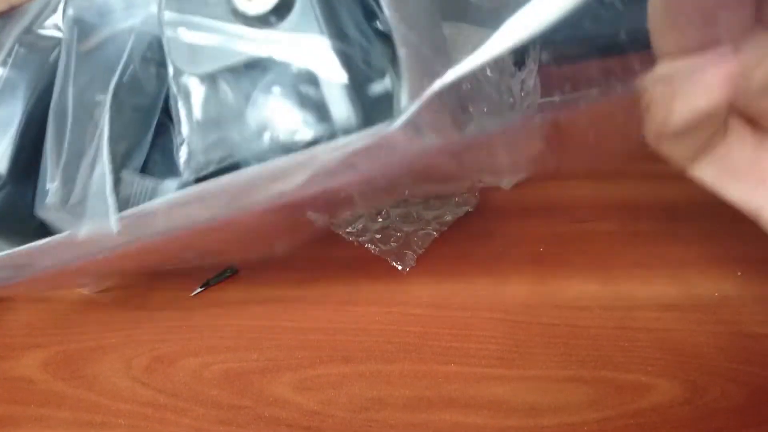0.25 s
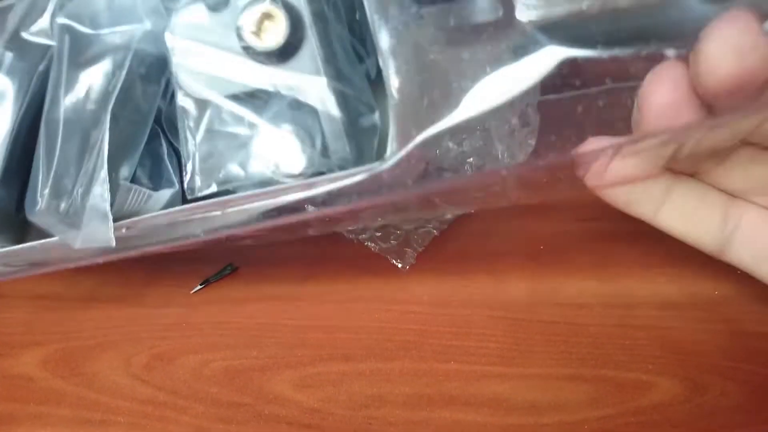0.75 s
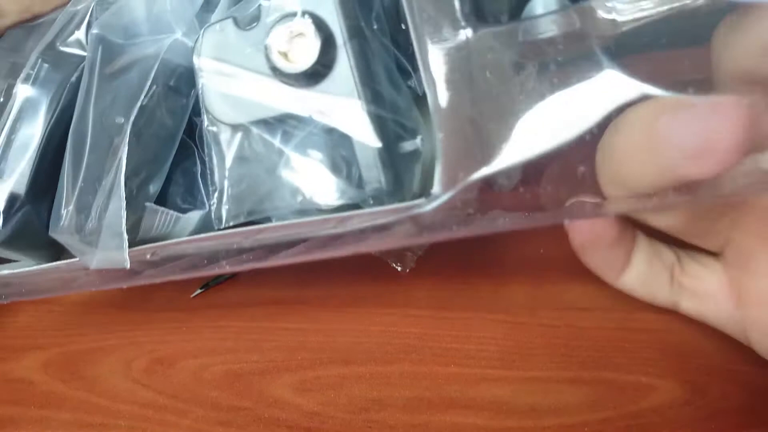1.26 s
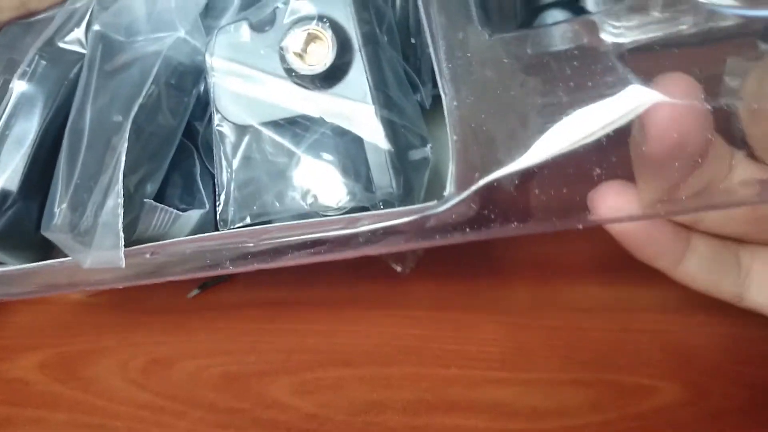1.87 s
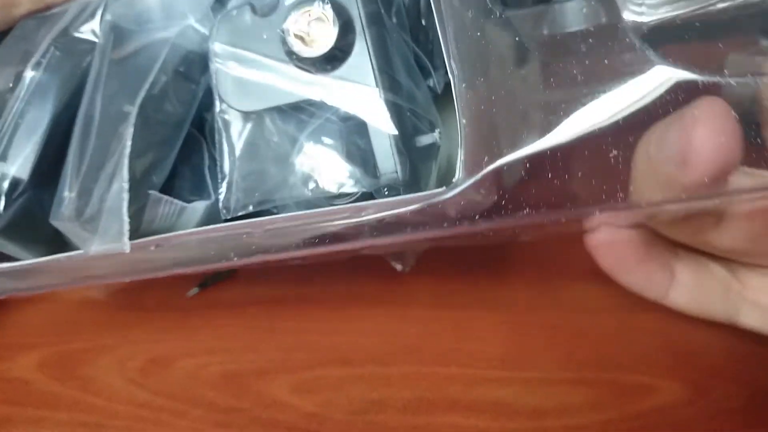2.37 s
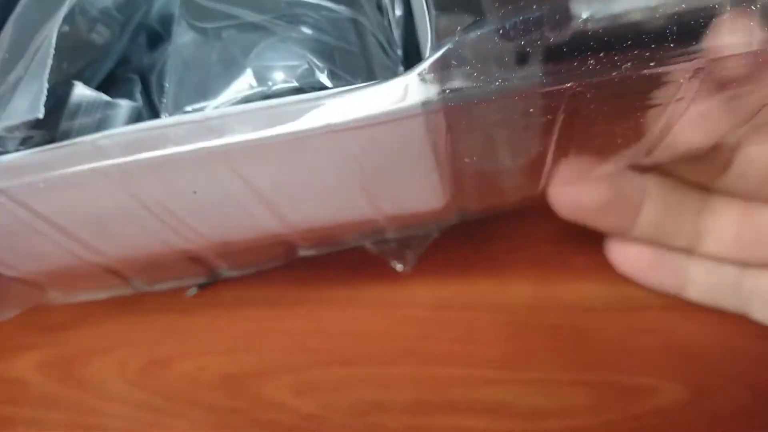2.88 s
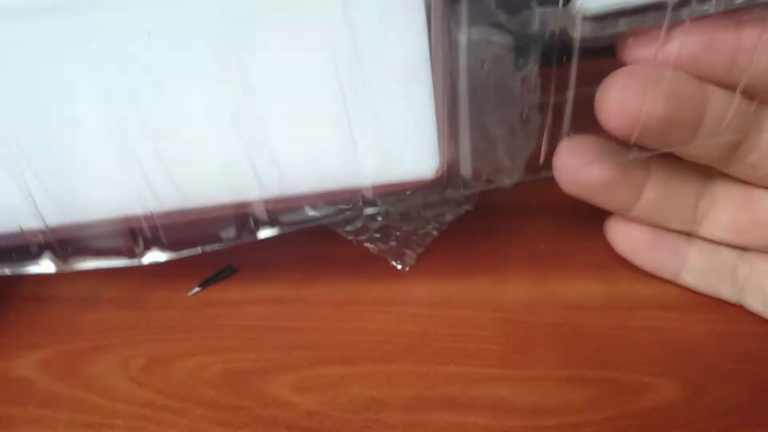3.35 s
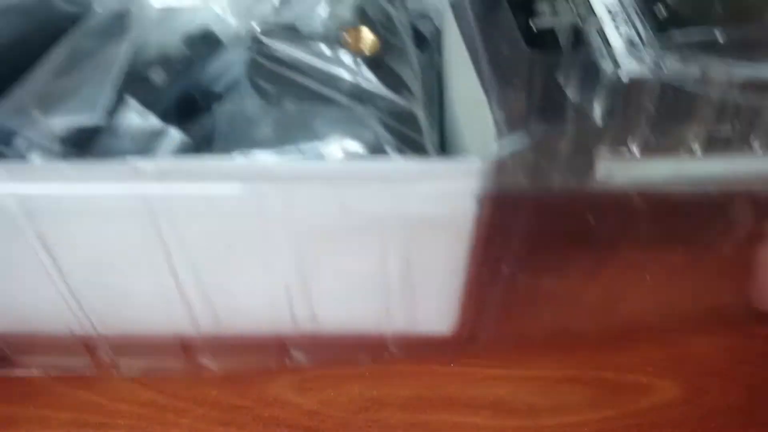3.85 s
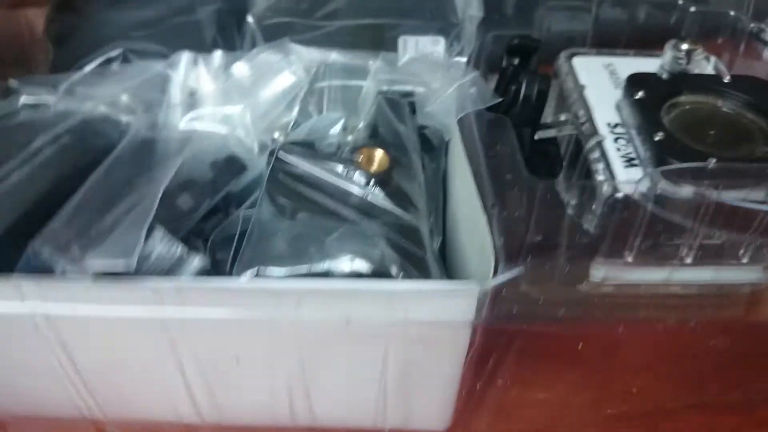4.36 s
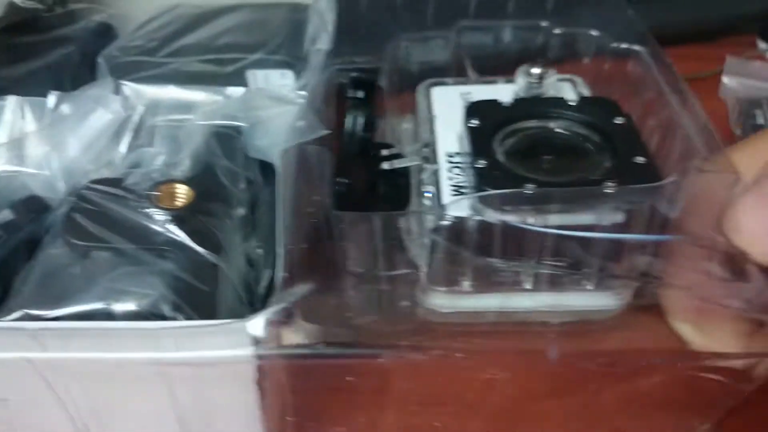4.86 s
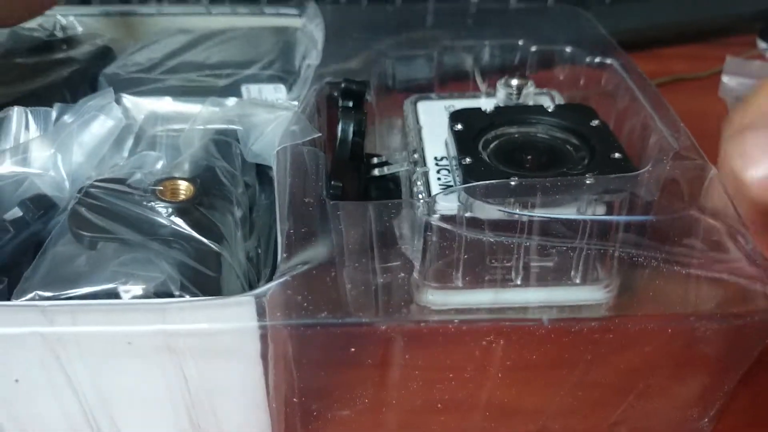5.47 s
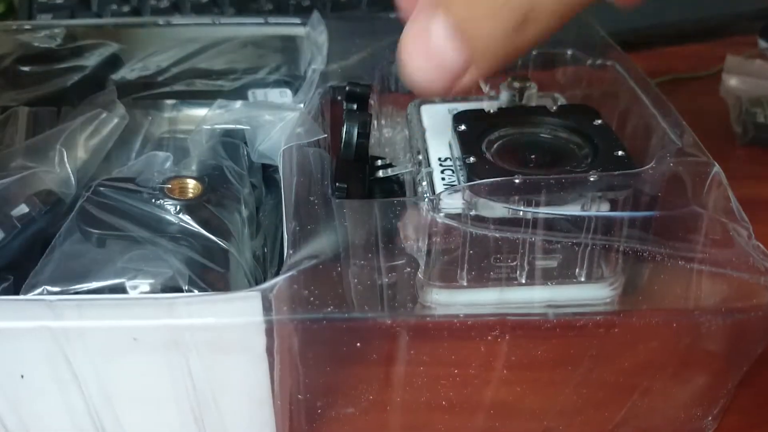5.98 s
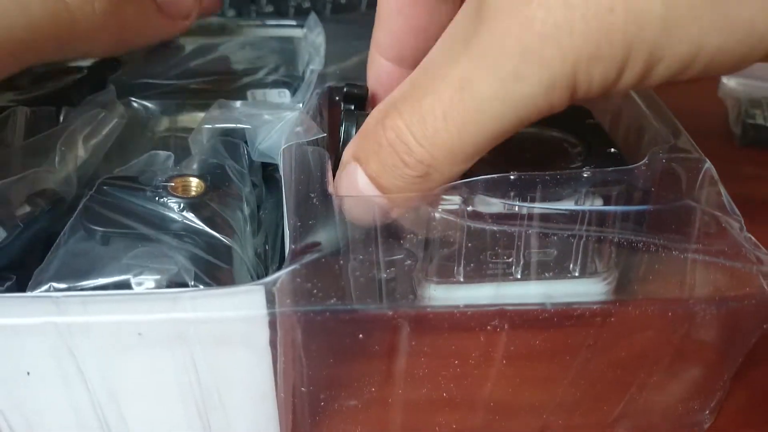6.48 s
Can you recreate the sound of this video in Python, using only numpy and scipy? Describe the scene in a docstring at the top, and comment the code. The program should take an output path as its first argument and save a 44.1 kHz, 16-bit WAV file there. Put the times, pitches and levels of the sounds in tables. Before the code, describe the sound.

Close stereo sound of hands flexing a stiff, thin plastic tray over a wooden desk in a small room. From 0 to 0.8 s, soft crinkles and filmy rustle surround a sharp bright snap at 0.2, with smaller ticks after. At 1.14 a loud, hollow, quickly damped pop lands, trailing rustle until 1.3. Sparse faint clicks follow, with light crackling around 2.2 and 2.6 to 3.0, then a near lull to 3.85. From 3.9 to 4.15 the shell buckles in a dense burst, with strong pops at 4.02 and 4.14 and a bright film scrape. Busy uneven rustling and snaps run from 4.45 to 5.3, another crackle comes at 5.6, then quiet. At 6.17 a small snap precedes a tiny dry finger squeak around 6.25; crackles and pops close at 6.5 to 6.65. Faint hiss, hum and low rumble persist.

```python
"""Hands turn a stiff clear plastic tray over a wooden desk, close to a two-port microphone.
Dents snap through in short ragged slips that ring the shell, and wide panels pop with a damped swing.
Hands and film rub in swells of tiny slips and grains, and a small part squeaks under a finger.
A small room answers with fading noise; behind it lie desk rumble, a faint noise floor and mains hum."""
import sys
import numpy as np
from scipy import signal
from scipy.fft import rfft, irfft, next_fast_len
from scipy.io import wavfile
from scipy.ndimage import uniform_filter1d

SR = 44100
rng = np.random.default_rng(int(sys.argv[2]) if len(sys.argv) > 2 else 0)


def transcribe(u):
    """Save the signal u as a 16-bit wav file named by the first command-line argument.

    u: samples, shape (n,) or (channels, n), limited to [-1, 1]; the rate is SR.
    q: integer samples, one column per channel.
    """
    v = np.clip(np.atleast_2d(u).T, -1, 1)
    q = np.round(v * 32767).astype(np.int16)
    wavfile.write(sys.argv[1], SR, q)


N = 296793  # length in samples

# Dents snapping. Each row: start in seconds, base level in dB, brightness in dB per octave,
# bend of that slope in dB per octave squared, pitch of the dent in Hz, base slip length in ms,
# left minus right in dB.
DENT_SNAPS = [(0.017, -44.5, -6.5, 1.93, 620, 1.1, 5.5), (0.065, -42.5, 4.5, -1.5, 764, 1.7, 1),
              (0.089, -50, -3.5, 1.3, 1160, 2.2, 9), (0.206, -42.5, 2.5, -1.8, 1290, 2.5, 2),
              (0.212, -18.5, 4, -0.69, 1378, 0.98, -2), (0.275, -35, -5, -1, 830, 1.2, 0.5),
              (0.322, -42, 6.5, -2.05, 1480, 2.6, 3), (0.332, -46.5, 0, -2.4, 1490, 2.3, -1),
              (0.343, -49.5, 1.5, 0.53, 407, 3.7, 3.5), (0.428, -51, 0, -2, 900, 2, 6),
              (0.436, -49.5, 8.5, -2.5, 500, 13, 3.5), (0.482, -52, 13.5, -5, 920, 6.4, -2),
              (0.554, -55, 16, -5.5, 513, 5.1, 1), (0.65, -43.5, 5, -5, 800, 2.1, 1),
              (0.737, -58.5, 11.5, -3.5, 680, 1.9, 6), (0.751, -50, 1, -4, 1340, 2.1, -2),
              (0.832, -45.5, -2.5, 0.05, 863, 4.7, 2.5), (0.939, -52.5, -6, 1.98, 1210, 2.7, 3),
              (1.016, -66, -0.5, 0.5, 900, 1.5, 4), (1.064, -53, -7.5, 1.84, 1110, 6, 5.5),
              (1.141, -20.5, -3, -1.4, 770, 4.6, -3), (1.150, -24.5, -2, 0, 1400, 1.6, 2),
              (1.185, -34, 1, -0.32, 760, 2.4, 2.5), (1.281, -39.5, 1.3, -0.42, 1310, 2.6, -0.5),
              (1.306, -56.5, 2.5, -0.6, 904, 2, 0), (1.34, -49.5, -4.5, 0.5, 730, 3.5, 3),
              (1.416, -68.5, 4, -0.5, 900, 1.7, 5), (1.437, -81, 6.5, 0.7, 559, 2.6, -4.5),
              (1.512, -71, 3.5, 0, 900, 1.5, 3), (1.52, -57.5, 2, -1.06, 1400, 4.2, 2.5),
              (1.559, -57, -7, 1.5, 418, 2.1, 4), (1.619, -72, 2.5, 0, 904, 1.6, 5),
              (1.658, -52, -3, -0.2, 696, 1, 5.5), (1.811, -75, 6.5, -0.2, 1400, 0.92, 0),
              (1.826, -57, 7, 0.26, 1410, 1.3, 0.5), (1.943, -58.0, -1, -0.3, 818, 2.7, 1.5),
              (2.11, -43, -0.5, 0.1, 860, 3.5, 2.5), (2.175, -44, -6, -1, 823, 2.5, 2.5),
              (2.209, -40, 2.5, -0.73, 832, 2.5, 3), (2.239, -46, -1, -0.28, 842, 7.1, 4.5),
              (2.557, -54, -2.5, 0.56, 547, 3.6, 2), (2.595, -51.5, -3.5, -0.5, 684, 6, 2),
              (2.607, -51, 1.5, -1.8, 900, 4, 2), (2.723, -43, 3, -0.4, 560, 2.1, 6),
              (2.733, -47, 5.5, 0.08, 579, 1.3, 3.5), (2.749, -49, 1.5, 0.54, 990, 2.3, -1),
              (2.775, -51.0, 1, -1, 1167, 1.6, 0), (2.856, -72.5, -2.5, 1.4, 900, 1.6, 4.5),
              (2.864, -74, -2, 0, 900, 1.5, -2), (2.935, -58.5, 10, -2.5, 880, 1.3, 7.0),
              (2.992, -52.5, 8, -1.62, 980, 1.05, 6), (3.01, -49, -3.8, 1, 1410, 1.5, 1),
              (3.037, -40.5, 1.5, 0.37, 510, 1.66, 3), (3.048, -57.5, 10.5, -2.3, 916, 2.1, 0),
              (3.266, -63.5, 3.4, -1.95, 758, 2.5, 6), (3.378, -58, -0.9, -0.05, 1264, 2.3, 3),
              (3.427, -75.5, 3.5, -0.05, 898, 1.1, 2), (3.493, -64.5, -1.5, -1, 1000, 2.7, 2),
              (3.600, -63, 0.5, -1, 1300, 4, 1.5), (3.613, -68, 4.5, -1, 1304, 2, 2),
              (3.650, -67.5, 6, -1.02, 1404, 1.2, 2.5), (3.659, -58.5, 0, -1, 1100, 2.6, 1.0),
              (3.867, -46.5, 0.5, -3, 620, 1.7, 1), (3.885, -37.5, -1.3, 1, 564, 4.3, 0),
              (3.915, -49, 2.5, 0.08, 794, 1.9, 4), (3.934, -43, 4.5, -1.27, 760, 5.2, 1),
              (3.963, -32, -3, 2.02, 810, 9.3, -4), (3.973, -26.5, 2.5, 0.3, 1250, 5, -2),
              (4.015, -31.5, -1.5, 1.5, 890, 14.4, -9.5), (4.02, -22.5, -1.5, 1.74, 866, 0.93, -0.5),
              (4.136, -25.5, -2.5, 1.01, 810, 1.35, 0.5), (4.222, -50.5, 6.5, -3, 900, 3.7, 6.5),
              (4.264, -66, 0.5, 1.4, 900, 2.2, 2), (4.318, -66.5, 10, -1.35, 820, 2.5, 6),
              (4.327, -62.5, 6.5, -0.1, 825, 2, 13), (4.44, -58.5, 3.5, -1.5, 900, 1.4, 11),
              (4.466, -48, 1, -0.4, 634, 4.4, 2.5), (4.491, -38.5, -0.9, 0.74, 660, 5.3, 4.5),
              (4.5, -41, 2.5, -0.35, 1280, 3.3, -2), (4.511, -42.5, 7, -1.47, 1150, 3.5, 2.5),
              (4.572, -49, 7, -3.5, 684, 2.3, 8), (4.723, -44, -2.5, 1, 1070, 10.7, 3),
              (4.826, -52.5, 0.5, -0.5, 1080, 2.5, 5), (4.865, -42.5, 1.5, 0.35, 1240, 2.4, 6),
              (4.916, -44.5, 1.5, -4.5, 1370, 1.8, 7.5), (4.982, -51.5, 1.25, 0.51, 503, 8.1, 7.5),
              (4.999, -46, 1.5, -0.3, 1170, 1.9, 1), (5.029, -45.5, -3.2, -0.4, 656, 11, 0.5),
              (5.07, -52.5, -0.7, 0.83, 890, 3.2, 0), (5.085, -34.5, -3, 0.85, 604, 2.1, 0),
              (5.114, -48, 5.5, -3, 990, 2.5, 0), (5.153, -52.5, 3.1, -0.2, 1190, 2.2, 0),
              (5.164, -53, 0.5, 0.5, 580, 2.5, 6), (5.186, -51.5, 1.8, 0.5, 1100, 2.9, 0),
              (5.264, -49, -5, 1.66, 473, 2.3, 4), (5.286, -38.5, -4, 0.56, 1210, 5.5, 2),
              (5.294, -39.5, -3, 0.5, 644, 1, 2), (5.308, -52, -1.5, 1.34, 649, 2.8, 6),
              (5.441, -60, -1, 1.07, 880, 1.5, 0.5), (5.474, -61, 0.5, 0.3, 900, 1.4, 1),
              (5.508, -56, -2.5, 1.62, 1150, 1.4, 6), (5.542, -47.5, -6, 1.75, 720, 1.8, -1),
              (5.577, -41, -1, -1.3, 580, 6.3, 1), (5.588, -32, -3.5, 0.38, 1002, 6.8, 1.5),
              (5.605, -39.5, -5.5, 2.06, 685, 7.5, 2.5), (5.932, -71.5, 2, -0.5, 900, 1.5, 1),
              (6.16, -51, 0, -3, 1130, 2.3, 3), (6.167, -37.5, 0.1, -0.18, 873, 2.4, 0.5),
              (6.23, -55, -4, -5, 880, 2.5, 1.5), (6.398, -51.5, 4, -1, 1090, 2.2, 3),
              (6.467, -71, 5, -0.5, 894, 1.5, 1), (6.504, -52, -1.5, 0.5, 1070, 7.5, 4),
              (6.511, -40, -2, -1.7, 1083, 1.9, 2), (6.55, -43.5, 0.5, -1.4, 676, 2.8, 1.5),
              (6.579, -41, -6.5, 0.3, 1110, 5.8, 0), (6.586, -33.5, 1.5, -1.02, 936, 1.7, 3),
              (6.61, -33, -0.6, -0.37, 910, 1.4, 1), (6.63, -33.5, -3, 0.5, 1100, 2, -1)]

# Ways the shell can ring, from its lowest part to its highest.
# Each row: base pitch in Hz, base level in dB, time to fall by 60 dB in seconds.
THUD_MODES = [(121, -2, 0.044), (179.7, -0.5, 0.087), (277, 8.5, 0.029)]
BODY_MODES = [(371.6, -14.5, 0.061), (538.6, -3, 0.024), (683, 1, 0.018), (770, -0.5, 0.022),
              (887, -0.5, .018), (1035, 4, 0.011), (1236, 0, 0.018), (1470, -3, 0.022)]
CRACK_MODES = [(1680, 4, 0.0044), (2300, 2, 0.0065), (2855, -3, 0.0092), (3316, -5.5, 0.013),
               (3765, -8, 0.017), (4190, -6.5, 0.016)]
FIZZ_MODES = [(4700, 1, 0.0033), (5340, 0, .0035), (6100, -5.5, 0.0059), (6640, -3.5, 0.0031),
              (7000, -10.5, 0.0017)]
SHEEN_MODES = [(7870, 3, 0.001), (9750, -6, 0.0027), (10930, -4.5, 0.001), (11540, -4.5, 0.002),
               (12600, -3.5, 0.0013), (14100, -10, .0015)]
PARTS = THUD_MODES, BODY_MODES, CRACK_MODES, FIZZ_MODES, SHEEN_MODES

# These lists have one value for each part, from thud to sheen.
# Height of each part above the body, in octaves.
PART_OCTAVES = np.array(np.array([-2.3, 0, 1.6, 2.7, 3.6]))
# Level of each part of an average snap, in dB added to the level of the snap.
SNAP_PART_DB = np.array([-19.5, 2.5, 0.5, -3.5, -20])
# Level of each part while a dent settles, in dB: duller than the snap.
SETTLE_PART_DB = [-2.5, -1, -3, -4, -12]
# Factor on the slip length: the treble lasts longer here when the factor is larger.
SLIP_LENGTH_FACTOR = [0.11, 0.78, 1.8, 1.9, 1.9]
# Weight, 0 to 1, of the separate push that only the right port hears, from another patch of shell.
UNLIKE = [0.18, 0.93, 0.99, 0.98, 1]
# Level of each part of the slow rubbing, in dB added to the level of the rub.
RUB_PART_DB = np.array([-4, 0, -0.5, -11.5, -18.5])
# Level of each part of an average swell, in dB added to the level of the swell.
SWELL_PART_DB = np.array([-13.5, 1.5, -3, -9.5, -22])
# How far each part follows the brightness of a rub, in octaves.
RUB_OCTAVES = np.array(np.array([-0.5, 0, 1.5, 4.0, 3.0]))

# Wide panels flipping over in one push. Each row: start in seconds, base level in dB,
# pitch in Hz, time to fall by 60 dB in ms, left minus right in dB.
PANEL_POPS = [(0.2128, -8.5, 1420, 4.7, 0.5), (0.6523, -22.5, 1140, 6.8, 2.5), (0.753, -38.5, 902, 7, -2.5),
              (1.1425, -2.5, 843, 15.6, 3.5), (2.176, -34, 700, 7.6, 0), (4.0196, -7.5, 850, 22, 2),
              (4.1359, -14.5, 894, 16, 1), (5.0865, -28, 795, 10.8, 3), (6.168, -26.5, 960, 13, 0),
              (6.587, -25.5, 910, 8.5, 1), (6.628, -21, 1000, 23, 7)]
# The hollow of the tray, ringing after a pop. Each row: base pitch in Hz, base level in dB,
# time to fall by 60 dB in seconds.
HOLLOW_MODES = [(740.3, -22, 0.12), (807, -24, 0.077)]

# Slow pressure of the rubbing hands. Each row: time in seconds, base level in dB,
# brightness in dB per octave above the body.
RUB_PRESSURE = [(0.0, -63, 3.5), (0.28, -60, -6), (0.49, -59, -0.5), (0.9, -68, -0.5), (1.29, -63, 1),
                (1.59, -66, -1.5), (1.89, -70.5, -2), (2.2, -70, -1.5), (2.55, -75, -0.5), (2.74, -63, 0),
                (2.9, -68, -0.5), (3.35, -76.5, -0.5), (3.6, -85, 0), (3.84, -78.5, -0.5),
                (3.92, -58, -0.5), (4.05, -51, -1.5), (4.27, -62, 0.5), (4.74, -68, 4.5), (5.14, -58.5, -1),
                (5.33, -82, 3), (5.57, -60, 0), (5.81, -74.5, 3.5), (6.02, -91, 2.5), (6.22, -81, 2.5),
                (6.35, -71, -2.5), (6.73, -74, -3)]
# Swells of rustle. Each row: crest in seconds, rise in ms, fall in ms, base level in dB,
# brightness in dB per octave above the body.
RUSTLE_SWELLS = [(0.098, 26, 12, -53, 2), (0.241, 11, 49, -48.5, -8), (.29, 23, 35, -45.5, 0.5),
                 (.45, 17, 19, -51.5, 1.5), (.575, 21, 47, -54.5, 1.5), (0.789, 40, 47, -58.5, 0.5),
                 (1.21, 42, 39, -48.5, -11.5), (1.281, 17.5, 20, -50, -0.5), (2.228, 42, 39, -53, -0.5),
                 (2.602, 22, 23, -56, -6.5), (3.04, 24.3, 25, -57.5, 0), (3.615, 50, 50, -72, 1),
                 (3.892, 7.4, 25, -44.5, 0), (4.35, 12, 51, -62, 3), (4.52, 18, 43, -48.5, -4.5),
                 (4.705, 53, 27, -49.5, 1), (4.85, 24, 36, -49.5, -1), (4.932, 16, 30, -51, -5.5),
                 (5, 11, 24, -46.5, -6.5), (5.119, 22, 17, -50, -1), (5.181, 32, 37, -48.5, -2.5),
                 (5.27, 19, 24, -47, -6.5), (5.296, 15, 18.4, -61, 5.5), (5.535, 18, 15, -58, 2),
                 (5.597, 15.6, 11, -44, 2.5), (6.279, 14.7, 12, -49.5, -5.5),
                 (6.532, 8.8, 38, -53.5, -10.5), (6.639, 9, 15.6, -46.5, -6)]
# Thin film dragged over the tray. Each row: crest in seconds, rise in ms, fall in ms,
# level in dB, centre of the band in Hz.
FILM_DRAGS = [(0.314, 3, 4.6, -40, 3800), (0.442, 10, 35, -58, 2900), (0.565, 8, 55, -46.5, 3260),
              (0.785, 30, 30, -55.5, 3000), (4.04, 10, 40, -38, 6400), (4.154, 11, 52, -44, 3400),
              (4.33, 6, 35, -53, 5900), (4.72, 65, 22, -51.5, 4800)]
# Squeaks of a small part under a finger. Each row: start in seconds, length in ms, level in dB.
FINGER_SQUEAKS = [(6.244, 9.4, -38), (6.262, 30.6, -42), (6.32, 140, -67.5)]
# Ringing of that small part. Each row: pitch in Hz, level in dB, time to fall by 60 dB in seconds.
SMALL_PART_MODES = [(1620, -3, 0.013), (2100, -11.5, 0.0069), (3096, 0, 0.014), (3350, -2, 0.0083)]

# Echoes of the room. Each row: centre of the band in Hz, level in dB, time to fall by 60 dB in seconds.
ROOM_BANDS = [(203, -24.5, 1), (700, -18.5, 0.44), (2100, -23.5, 0.23), (4740, -21, 0.42),
              (10800, -21, 0.35)]
# Tone of the right port. Each row: pitch in Hz, level against the left port in dB.
RIGHT_PORT = [(60, 4), (180, -10), (700, -4.5), (2500, -8.5), (5000, -7), (9000, 1), (15000, 2.5)]
# Low rumble carried through the desk. Each row: time in seconds, base level in dB.
DESK_RUMBLE = [(0.0, -53.5), (1.0, -59), (2.25, -65.5), (2.6, -52.5), (3.5, -71), (3.8, -73.5),
               (4.03, -60.5), (5.47, -69), (5.68, -59), (6.1, -68.5), (6.22, -58.5), (6.41, -68),
               (6.6, -60), (6.73, -63)]
# Lowest and highest pitch of the rumble, in Hz.
RUMBLE_HZ = 9, 40
# Shape of the noise floor. Each row: pitch in Hz, relative level per Hz in dB.
FLOOR_SHAPE = [(20, 0.5), (45, -11), (70, -26), (110, -12), (160, -19.5), (255, -11), (450, -13),
               (700, -17), (1190, -29.5), (1910, -22.5), (2460, -28), (6360, -34.5), (7800, -49),
               (13900, -44.5), (16000, -57.5)]
# How alike the floor is at the two ports. Each row: pitch in Hz, likeness from 0 to 1.
FLOOR_ALIKE = [(30, 0.93), (200, 0.37), (700, 0.12), (3000, .02), (16000, .02)]
# Mains hum. Each row: pitch in Hz, middle level in dB rms.
HUM_TONES = [(100.1, -80), (1877, -86.5)]

# Every dent bends the shell a little differently: random share of pitch, random dB of strength.
DETUNE, SCATTER_DB = 0.04, 2.0
BODY_HZ = 900  # middle of the body
FOCUS_DB, FOCUS_OCTAVES = 9, 0.18  # modes near the pitch of the dent ring louder

# The jolt replaces both the noise and its random strength, so its size counts twice.
JOLT_SIZE, JOLT_DELAY_MS = 2.35, 0.7
JOLT_PER_DB, USUAL_DB = -0.06, -38  # smaller jolt in a strong snap: dB per dB above the usual level
# The creases around a dent creep before it and settle after it.
CREEP_MS, SETTLE_MS, SETTLE_DB = 0.49, 26, -20.5
SETTLE_PER_TILT = -0.16  # a tight bright dent settles less: dB per dB of brightness

POP_RISE_MS, POP_LOW_HZ = 0.14, 260

SLIPS_PER_S, SLIP_SPREAD_DB = 1600, 3.5
TICKS_PER_S, TICK_DB = 10, 15  # now and then a small crease pops among the slips
FLUTTER_DB, FLUTTER_HZ = 1.5, 59.15  # quick changes of hand pressure
SPOT_DB = 4  # the hand wanders between the spots, so the colour drifts
RUB_PAN_DB = -0.5  # left minus right
FILM_OCTAVES, FILM_GRAINS_PER_S = 0.22, 2000  # width of each band, density of grains

RIGHT_LAG_MS = 0.11
RUMBLE_WANDER_DB = 2.5
FLOOR_DB, FLOOR_PAN_DB = -66.5, 5  # middle level, left minus right
MIC_TOP_HZ, TOP_HZ = 14900, 16000  # top of the microphone, top of the recorder


def snaps(size=4096, before=128):
    """Each dent gives way in a short ragged slip that rings all parts of the shell."""
    out = np.zeros((2, N + size))
    ms = (np.arange(size) - before) * 1000 / SR  # 0 at the jolt
    creep = np.exp(np.minimum(ms, 0) / CREEP_MS)
    for s, level_db, tilt_db, bend_db, dent_hz, slip_ms, pan_db in DENT_SNAPS:
        # a small tight dent is bright, a wide soft one dull
        slope_db = tilt_db * PART_OCTAVES + bend_db * np.maximum(PART_OCTAVES, 0) ** 2
        part_db = level_db + SNAP_PART_DB + slope_db
        chance = rng.standard_normal((5, 8, 2))
        rag = rng.standard_normal((3, size))
        # the moment of snapping through is one hard jolt, common to both ports
        rag[:, before] = JOLT_SIZE * undb(JOLT_PER_DB * (level_db - USUAL_DB))
        ragged = rag[:2] * np.abs(rag[2])

        # the settling comes in uneven little lumps
        lumps = rng.exponential(size=size) ** 2 * (rng.random(size) < 0.02)
        lumps = uniform_filter1d(lumps, 60)
        settle = np.exp(-ms / SETTLE_MS) * (0.8 + 0.9 * lumps / rms(lumps))
        settle *= undb(SETTLE_DB + SETTLE_PER_TILT * (tilt_db + 3 * bend_db))

        start = int((s + JOLT_DELAY_MS / 1000) * SR) - before
        for k, modes in enumerate(PARTS):
            # the same slope holds from mode to mode inside the part
            octave = np.log2(np.transpose(modes)[0] / BODY_HZ)
            from_dent = octave - np.log2(dent_hz / BODY_HZ)
            mode_db = tilt_db * octave + bend_db * np.maximum(octave, 0) ** 2
            mode_db += FOCUS_DB * np.exp(-(from_dent / FOCUS_OCTAVES) ** 2)
            shaped_modes = modes + np.outer(mode_db, [0, 1, 0])  # only the level column changes

            slip_fall = np.exp(-ms / max(slip_ms * SLIP_LENGTH_FACTOR[k], 0.05))
            after = slip_fall + settle * undb(SETTLE_PART_DB[k])
            slip = ragged * np.where(ms < 0, creep, after)
            sound = ports(slip, ring(shaped_modes, chance[k], size), UNLIKE[k])
            sound *= undb(part_db[k]) / rms(sound[:, :size // 8])
            out[:, start:start + size] += sound * pan(pan_db)
    return out[:, :N]


def pops(size=8192):
    """A panel flips with one strongly damped swing and the hollow rings, alike at both ports but for level."""
    out, t = np.zeros((2, N + size)), np.arange(size) / SR
    rise = 1 - np.exp(-t * 1000 / POP_RISE_MS)
    for s, db, hz, t60_ms, pan_db in PANEL_POPS:
        swing = -np.sin(2 * np.pi * hz * t) * 1000 ** (-t * 1000 / t60_ms)
        swing = swing / np.max(np.abs(swing))
        hollow = ring(HOLLOW_MODES, rng.standard_normal((2, 2)), size)
        start = int(s * SR)
        out[:, start:start + size] += (swing + hollow) * rise * undb(db) * pan(pan_db)
    return butter(out[:, :N], 2, POP_LOW_HZ, "high")


def rubbing(spots=7, size=4096):
    """Dense uneven slips ring several spots of the shell while the hand's pressure flutters."""
    parts = np.zeros((5, 2, N))
    flutter = undb(FLUTTER_DB * walk(FLUTTER_HZ))
    for _ in range(spots):
        strength = undb(SLIP_SPREAD_DB * np.minimum(rng.exponential(size=N), 5.5))
        grain = (rng.random(N) < SLIPS_PER_S / SR) * strength
        grain += (rng.random(N) < TICKS_PER_S / SR) * undb(TICK_DB)
        slips = grain * flutter * undb(SPOT_DB * walk(12)) * rng.standard_normal((2, N))
        for k, modes in enumerate(PARTS):
            tap = ring(modes, rng.standard_normal((8, 2)), size)
            parts[k] += ports(slips, tap / rms(tap), UNLIKE[k])
    # bring all parts to the same typical size before the pressure sets their levels
    parts = parts / np.median(np.abs(parts), axis=(1, 2), keepdims=True)
    return np.sum(parts * pressure()[:, None], axis=0) * pan(RUB_PAN_DB)


def pressure():
    """Harder or softer rubbing sets the gain of each part: a slow bed plus the swells."""
    t = np.arange(N) / SR
    s, bed_db, bed_tilt_db = np.transpose(RUB_PRESSURE)
    level_db, tilt_db = np.interp(t, s, bed_db), np.interp(t, s, bed_tilt_db)
    gain = undb(level_db + RUB_PART_DB[:, None] + tilt_db * RUB_OCTAVES[:, None])
    for s, rise_ms, fall_ms, level_db, tilt_db in RUSTLE_SWELLS:
        part_gain = undb(level_db + SWELL_PART_DB + tilt_db * RUB_OCTAVES)
        gain += swell(t, s, rise_ms, fall_ms) * part_gain[:, None]
    return gain


def film():
    """Dragged film makes fine uneven grains, in a narrow band of their own for each drag."""
    t, out = np.arange(N) / SR, 0
    grains = (rng.random(N) < FILM_GRAINS_PER_S / SR) * rng.exponential(size=N)
    grains = grains * rng.standard_normal((2, N))
    for s, rise_ms, fall_ms, db, hz in FILM_DRAGS:
        edges = hz * 2 ** (np.array([-FILM_OCTAVES, FILM_OCTAVES]) / 2)
        band = butter(grains, 1, edges, "band")
        out = out + band / rms(band) * undb(db) * swell(t, s, rise_ms, fall_ms)
    return out


def squeaks(size=4096):
    """A finger drags over a small loose part and its noisy push stirs a few modes."""
    t, push = np.arange(N) / SR, 0
    for s, length_ms, db in FINGER_SQUEAKS:
        progress = np.clip((t - s) * 1000 / length_ms, 0, 1)
        push = push + undb(db) * np.abs(np.sin(np.pi * progress)) ** 0.5
    tap = ring(SMALL_PART_MODES, np.zeros((8, 2)), size)
    tap = tap / np.sqrt(np.sum(tap ** 2))
    return ports(push * rng.standard_normal((2, N)), tap, 0.32) * pan(RUB_PAN_DB)


def room(x, size=32768):
    """Diffuse echoes, made of noise, die away band by band and differ at each port."""
    t, tail = np.arange(size) / SR, 0
    build_up = 1 - np.exp(-t / 0.00088)
    for hz, db, t60 in ROOM_BANDS:
        edges = [hz / 1.8, min(hz * 1.8, 0.45 * SR)]
        band = butter(rng.standard_normal((2, size)), 2, edges, "band")
        band = band * 1000 ** (-t / t60) * build_up
        width = hz * 2.5 / SR  # band width, so that wide and narrow bands get comparable gain
        tail = tail + undb(db) * band / np.sqrt(np.sum(band ** 2) / 2 * width) * width
    return signal.oaconvolve(x, tail, axes=1)[:, :N]


def rumble():
    """The desk shakes the microphone with low noise, a little differently at each port."""
    s, db = np.transpose(DESK_RUMBLE)
    shake = butter(rng.standard_normal((2, N)), 3, RUMBLE_HZ, "band")
    shake = np.array([shake[0], 0.36 * shake[0] + 0.5 * shake[1]])
    level_db = np.interp(np.arange(N) / SR, s, db) + RUMBLE_WANDER_DB * walk(1.7)
    return shake / rms(shake) * undb(level_db)


def floor():
    """Shaped noise for air, far rumble and microphone hiss, with the hum of a mains appliance as sines."""
    size = next_fast_len(N)
    alike = np.clip(on_hz(FLOOR_ALIKE, size), 0, 1)
    noise = rfft(rng.standard_normal((2, size))) * undb(on_hz(FLOOR_SHAPE, size))
    # a stronger middle makes the ports alike, a stronger side makes them differ
    mid, side = noise * np.sqrt([1 + alike, 1 - alike])
    air = irfft(np.array([mid + side, mid - side]), size)[:, :N]
    air = air / rms(air) * undb(FLOOR_DB + 0.5 * walk(3.1)) * pan(FLOOR_PAN_DB)
    t, hum = np.arange(N) / SR, 0
    for hz, db in HUM_TONES:
        hum = hum + np.sqrt(2) * undb(db + walk(9.4)) * np.sin(2 * np.pi * hz * t)
    return air + hum


def ring(modes, chance, size):
    """A tap makes one part ring as fading sines, pitches and strengths shaken by chance."""
    hz, db, t60 = np.transpose(modes)[:, :, None]
    t, count = np.arange(size) / SR, len(modes)
    hz = np.minimum(hz * (1 + DETUNE * chance[:count, :1]), 0.4 * SR)
    flip = (-1.) ** np.arange(count)[:, None]  # every other mode starts the other way
    gain = undb(db + SCATTER_DB * chance[:count, 1:]) * flip
    return np.sum(gain * np.sin(2 * np.pi * hz * t) * 1000 ** (-t / t60), axis=0)


def ports(push, tap, unlike):
    """Two pushes ring one part: the left port hears the first, the right a blend of both."""
    share = np.clip(unlike, 0, 1)
    right = np.sqrt(1 - share ** 2) * push[0] + share * push[1]
    blend = np.array([push[0], right])
    return signal.oaconvolve(blend, tap[None], axes=1)[:, :push.shape[1]]


def swell(t, s, rise_ms, fall_ms):
    """A rounded rise to the crest and an exponential fall."""
    return np.exp(-np.where(t < s, ((s - t) * 1000 / rise_ms) ** 2, (t - s) * 1000 / fall_ms))


def walk(rate):
    """Random levels held 1 / rate s and smoothed twice; spread near 1."""
    k = int(SR / rate)
    steps = np.repeat(rng.standard_normal(N // k + 1), k)
    return 1.3 * uniform_filter1d(uniform_filter1d(steps, k), k)[:N]


def on_hz(table, size):
    """Read a (Hz, value) table at the bins of a transform, in straight lines on a log axis."""
    hz, value = np.transpose(table)
    return np.interp(np.log(np.fft.rfftfreq(size, 1 / SR) + 1), np.log(hz), value)


def butter(x, order, hz, kind):
    """Smooth filter that keeps the low, high or band range of a sound."""
    return signal.sosfilt(signal.butter(order, hz, kind, fs=SR, output="sos"), x)


def pan(db):
    """Left and right gains for a left minus right difference in dB."""
    return undb([[db / 2], [-db / 2]])


def undb(db):
    """Gain of a level in dB."""
    return 10 ** (np.asarray(db) / 20)


def rms(x):
    """Root mean square: the average strength of a sound."""
    return np.sqrt(np.mean(x ** 2))


def scene():
    """The tray and its echoes reach the right port later and brighter; floor and rumble join in."""
    tray = snaps() + pops() + rubbing() + film() + squeaks()
    tray = butter(tray, 2, 80, "high")  # the tray's sounds carry little deep bass
    left, right = tray + room(tray)
    size = next_fast_len(N + 4096)
    lag = np.exp(-2j * np.pi * np.fft.rfftfreq(size, 1 / SR) * RIGHT_LAG_MS / 1000)
    right = irfft(rfft(right, size) * undb(on_hz(RIGHT_PORT, size)) * lag, size)[:N]
    return np.array([left, right]) + floor() + rumble()


def record(dry):
    """The microphone rolls off, the recorder rounds the loudest peaks and cuts the top."""
    heard = butter(dry, 4, MIC_TOP_HZ, "low")
    rounded = 0.95 * np.tanh(heard / 0.95)
    return signal.sosfilt(signal.ellip(8, 0.2, 70, TOP_HZ, fs=SR, output="sos"), rounded)


dry = scene()
out = record(dry)
transcribe(out)
```